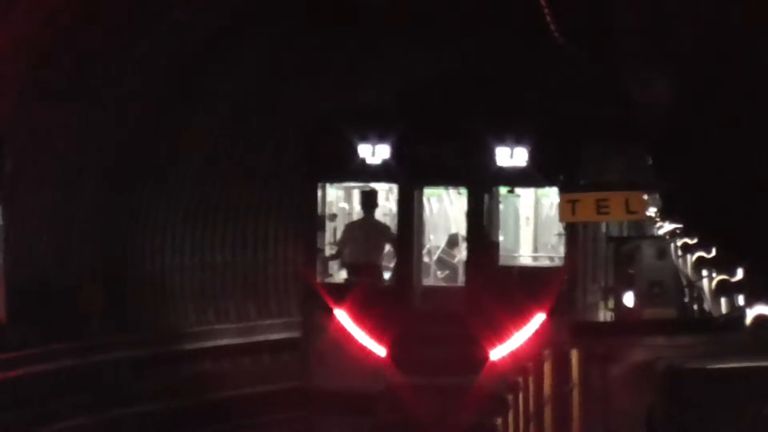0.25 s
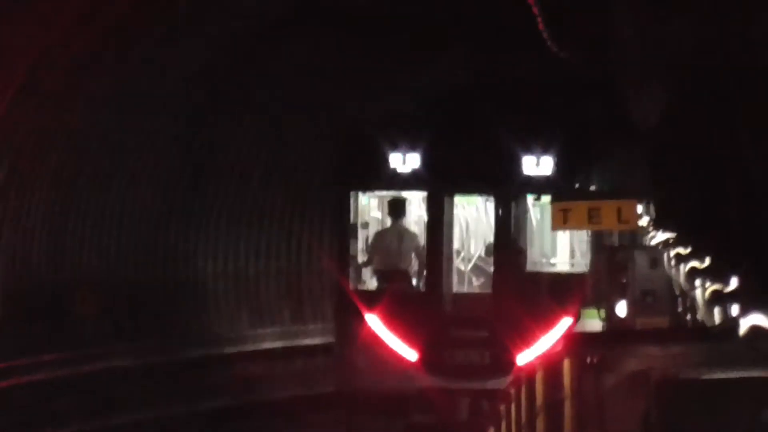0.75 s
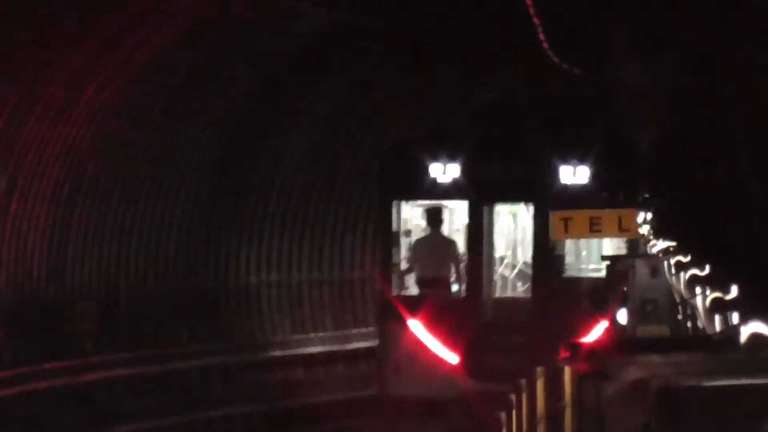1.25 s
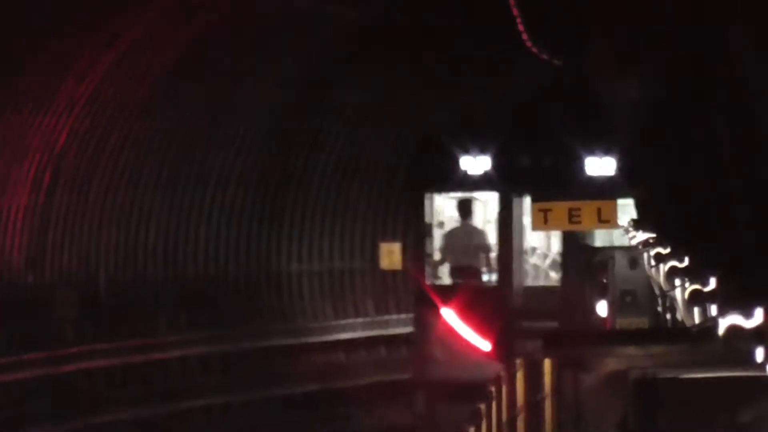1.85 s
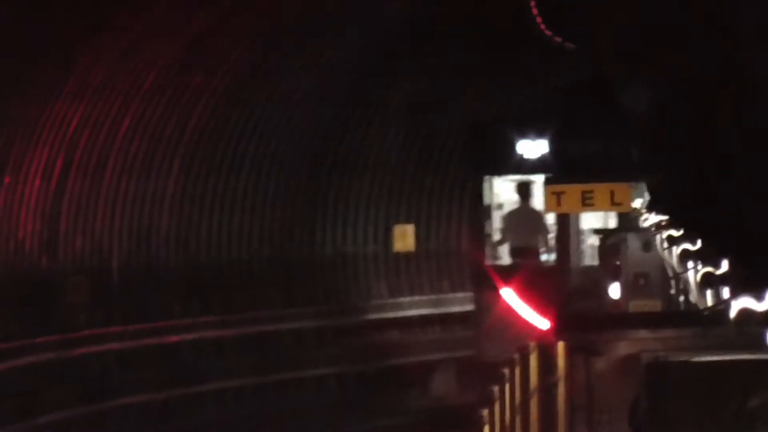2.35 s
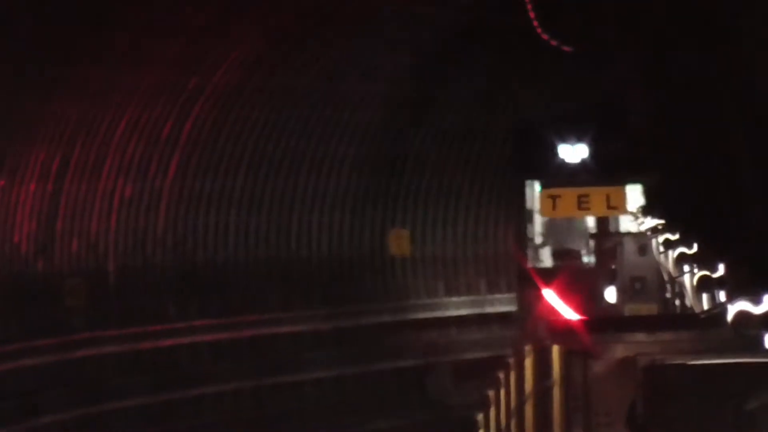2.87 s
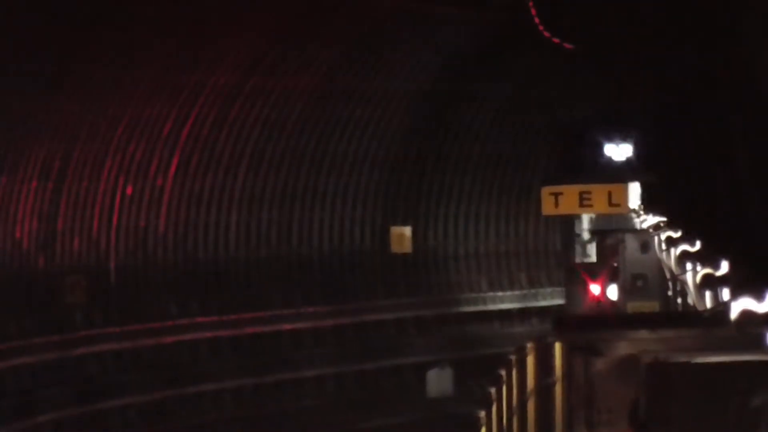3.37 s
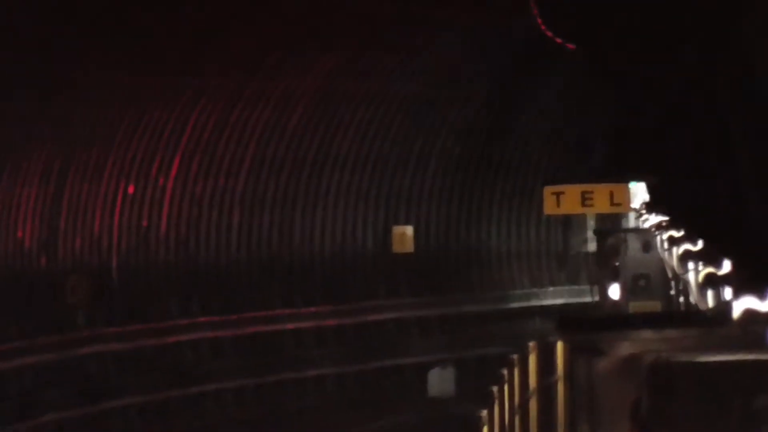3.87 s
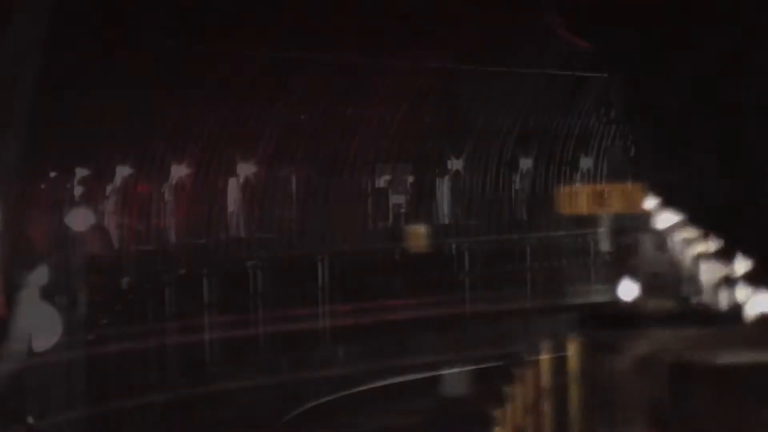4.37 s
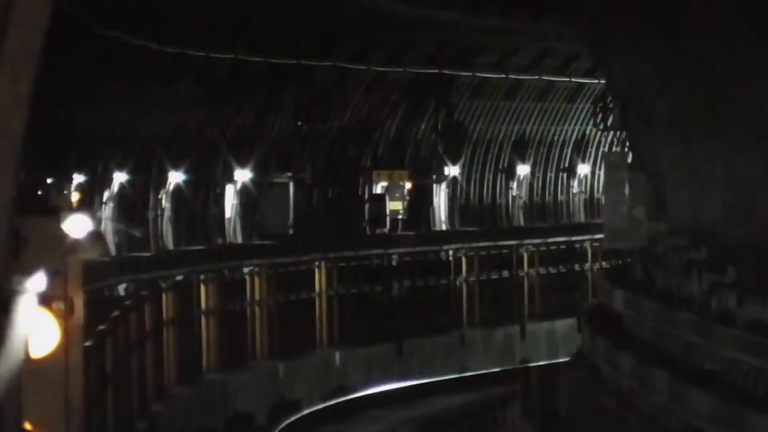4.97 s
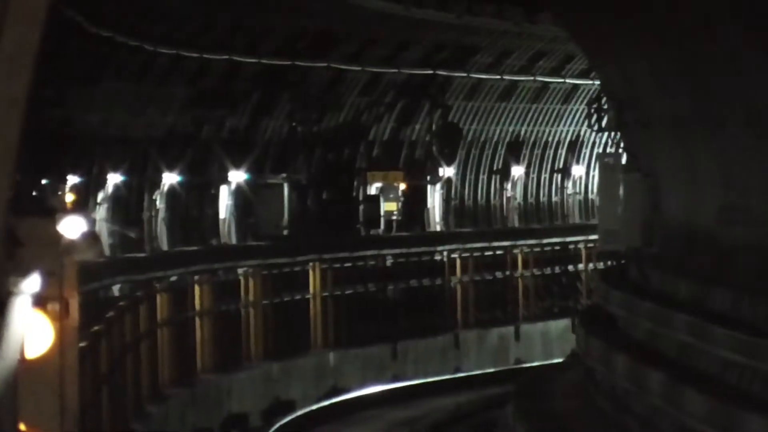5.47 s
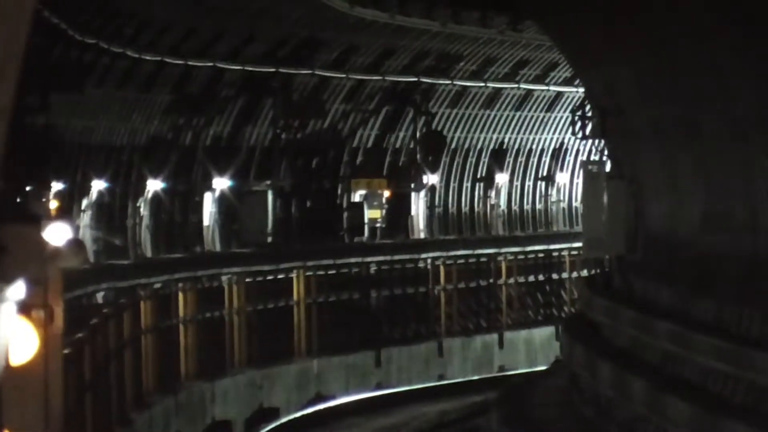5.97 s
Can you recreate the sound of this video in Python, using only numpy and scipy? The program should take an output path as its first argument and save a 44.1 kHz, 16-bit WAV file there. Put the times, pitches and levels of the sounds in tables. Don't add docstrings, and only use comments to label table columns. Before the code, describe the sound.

Hollow booming roll of a departing underground train fades with thin hiss; after a tiny gap, a quieter far hum, faint wheel squeal and late swelling roar.

```python
import sys
import numpy as np
from scipy import signal
from scipy.fft import rfft, irfft, next_fast_len
from scipy.io import wavfile
from scipy.ndimage import uniform_filter1d, map_coordinates

SR = 44100
rng = np.random.default_rng(int(sys.argv[2]) if len(sys.argv) > 2 else 0)


def gain_from_db(level_db):
    decades = np.asarray(level_db, float) / 20
    return 10 ** decades


def transcribe(u):
    v = np.clip(np.atleast_2d(u).T, -1, 1)
    q = np.round(v * 32767).astype(np.int16)
    wavfile.write(sys.argv[1], SR, q)


N = 274566
TIME = np.arange(N) / SR

# start_s, end_s
CUT = (4.6553, 4.6763)


def leaving_train():
    # pitch_hz, width_hz, level_db
    boom = [(95.3, 14.6, -5.5), (112.8, 4.5, 5.5), (131, 35, -1.5), (155.4, 38, -7)]
    drone = [(187, 11.4, -5), (217, 83, -5.5), (254, 30, -3), (250, 7.8, -14)]
    roar = [(342.7, 24, 0.5), (416.6, 62, 0), (512, 149, -7), (645, 74, -12.5), (765, 130, -12.5),
            (938, 187, -17.5)]
    wheel = [(1072, 58, -8), (1201, 122, -5.5), (1302, 31, -8)]
    # start_level_db, loss_db_per_s
    leaving = [
        (-29, -0.14),
        (-27, 1.24),
        (-30.5, 1.11),
        (-45.5, 1.56),
    ]
    # centre_s, length_s, change_db
    boom_swells = [
        (0, 0.11, -1),
        (.75, 0.17, -2.5),
        (2.7, .2, -1.5),
        (3.75, .2, -6.5),
        (4.36, 0.082, 3),
    ]
    drone_swells = [
        (0, 0.063, -1.5),
        (.55, 0.57, 2.5),
        (2.6, 0.52, 1.1),
        (4.15, .35, 3.5),
    ]
    roar_swells = [
        (0, 0.095, 1.9),
        (1.7, 0.27, 1.7),
        (2.9, .3, -1.1),
        (4.25, .15, 1.2),
    ]
    wheel_swells = [
        (0, 0.18, -1.5),
        (.95, 0.38, 4),
        (1.6, 0.54, 3.5),
        (3.65, 0.19, 3),
        (4.22, 0.065, -3),
    ]
    track = boom_swells, drone_swells, roar_swells, wheel_swells
    levels_db = [start_db - loss * TIME + swells(rows) + fades_db()
                 for (start_db, loss), rows in zip(leaving, track)]
    return rolling(levels_db, boom, drone, roar, wheel)


def coming_train():
    # pitch_hz, width_hz, level_db
    boom = [(99, 16, -13), (111.4, 41, 1), (141.5, 44, -3)]
    drone = [(241, 127, -4), (327, 26.5, -2), (458, 114, 0.5), (482, 62, 0)]
    roar = [(578, 44, -2.5), (673, 41, -4), (767, 100, -2), (904, 107, -7.5), (1024, 310, -12)]
    wheel = [(1130, 160, -5), (1270, 60, 0), (1350, 60, -4), (1480, 120, -14)]
    # far_level_db, gain_in_view_db, share_of_fade
    coming = [
        (-36, 3, 1.1),
        (-35, 1.5, 1.1),
        (-47, 8.5, .7),
        (-60, 12, .3),
    ]
    rounds_s, rise_s = 5.88, .03
    in_view = (1 + np.tanh((TIME - rounds_s) / rise_s)) / 2
    levels_db = [far_db + gain_db * in_view + share * fades_db() for far_db, gain_db, share in coming]
    return rolling(levels_db, boom, drone, roar, wheel)


def rolling(levels_db, boom, drone, roar, wheel):
    boom_db, drone_db, roar_db, wheel_db = levels_db
    return (gain_from_db(boom_db - 1.0) * noise(resonances(boom), steady=1.0)
            + gain_from_db(drone_db) * noise(resonances(drone), steady=.9)
            + gain_from_db(roar_db) * noise(resonances(roar), steady=0.5)
            + gain_from_db(wheel_db) * noise(resonances(wheel), steady=0.44))


def hum():
    # start_s, length_s, pitch_hz, level_db
    first_throbs = [(0.023, 0.5, 111.9, -23.5), (0.661, 0.035, 125.6, -28), (0.863, 0.018, 110.2, -22),
                    (1.0, .05, 127.3, -23), (1.139, 0.19, 112.4, -23.5), (1.448, 0.17, 112.4, -25),
                    (1.7, 0.13, 130, -29), (1.889, 0.32, 111.5, -27.5), (2.267, 0.15, 116.6, -31),
                    (2.54, 0.28, 111.2, -31), (2.85, 0.032, 116.5, -20), (3.004, 0.069, 112.4, -24),
                    (3.109, 0.05, 128.2, -27), (3.251, 0.062, 114.5, -26.5), (3.353, 0.098, 129.2, -28),
                    (3.507, 0.035, 114.9, -21.5), (3.59, 0.26, 135, -32), (3.903, 0.043, 131, -25),
                    (3.983, 0.024, 112.9, -24), (4.121, 0.049, 114.6, -22.5), (4.212, 0.19, 128, -26.5),
                    (4.552, 0.085, 113.5, -28.5)]
    second_throbs = [
        (4.85, .1, 141.1, -31.5),
        (4.986, 0.16, 142.3, -27),
        (5.375, 0.035, 139.3, -28),
        (5.528, 0.093, 140.9, -30.5),
        (5.786, 0.088, 141.9, -29),
        (5.972, 0.023, 120.8, -28.5),
        (6.043, 0.018, 139.6, -23.5),
        (6.142, 0.23, 143.6, -26),
    ]
    rise_s, fall_s, sag_db, rest_db = 0.053, .075, 4.5, -43.5
    throbs = np.concatenate([first_throbs, second_throbs])
    t = TIME[::50]
    each_db = np.array([held(s, rise_s, length, fall_s, db, sag_db, rest_db, t)
                        for s, length, hz, db in throbs])
    loudest = np.argmax(each_db - 1e-3 * np.abs(t - throbs[:, :1]), axis=0)
    curves = [throbs[loudest, 2], each_db.max(axis=0)]
    hz, hum_db = uniform_filter1d(curves, size=18, mode="nearest")
    return gain_from_db(np.interp(TIME, t, hum_db) - 0.5) * rough_line(np.interp(TIME, t, hz), 12, clear=3.9)


def songs():
    # centre_s, length_s, pitch_hz, width_hz, level_db
    wheel_songs = [
        (.05, .12, 1980, 60, -63),
        (.08, .15, 4300, 900, -67),
        (.05, .12, 7600, 700, -72),
        (1.2, .15, 2000, 60, -66),
        (2.35, .15, 1700, 70, -65),
        (2.4, .12, 1900, 60, -67),
        (2.45, .12, 1060, 50, -55),
        (3.9, .35, 4300, 900, -69),
    ]
    tube_songs = [
        (.12, 0.11, 250, 17, -29.5),
        (.45, 0.12, 232, 19, -28.5),
        (.78, 0.19, 253, 18, -30),
        (1.7, 0.21, 246, 18, -30),
        (2.6, .2, 247.9, 18, -38.5),
        (3.85, .15, 250, 18.1, -31.5),
        (4.2, .2, 256, 18.2, -29.5),
    ]
    total = 0
    for rows, clear in ((wheel_songs, 0), (tube_songs, 1.2)):
        for s, length, hz, width_hz, db in rows:
            bump = np.exp(-((TIME - s) / length) ** 2)
            total = total + gain_from_db(db) * bump * rough_line(hz, width_hz, clear=clear)
    return total


def drive():
    # start_s, length_s, level_db
    gear_throbs = [
        (.03, .012, -65),
        (.115, .02, -60),
        (.19, .05, -56),
        (.295, .04, -57.5),
    ]
    edge_s, rest_db, ends_s = .024, -76, .45
    gear_db = np.max([held(s, edge_s, length, edge_s, db, 0, rest_db) for s, length, db in gear_throbs], axis=0)
    whine_db = -74 - 1.7 * TIME + fades_db()
    whine = gain_from_db(whine_db) * rough_line(10415, 220, clear=.4)
    gear = gain_from_db(gear_db) * (TIME < ends_s) * rough_line(2352, 15, clear=4)
    return whine + gear


def squeal():
    start_s, attack_s = 5.11, 0.0518
    low_db, high_db = [held(start_s, attack_s, length, .15, db, loss * length, -100)
                       for db, loss, length in ((-77, 10, .45), (-73.5, 40, .35))]  # dB, loss dB per s, s
    low = gain_from_db(low_db - 2) * rough_line(7950, 450, clear=0)
    high = gain_from_db(high_db) * rough_line(9580, 400, clear=.2)

    slide_s, length_s, slide_db, loss_db_per_s = 5.14, .06, -74, 60
    from_hz, to_hz, climb_s = 9650, 11150, .016
    rise_db = held(slide_s, .06, length_s, .07, slide_db, loss_db_per_s * length_s, -110)
    rise_hz = to_hz - (to_hz - from_hz) * np.exp(-np.maximum(TIME - slide_s, 0) / climb_s)
    slide = gain_from_db(rise_db + 3.5) * rough_line(rise_hz, 500, clear=1.2)
    upper = gain_from_db(-78) * np.exp(-((TIME - 5.28) / .07) ** 2) * rough_line(11700, 990, clear=0)

    t = np.arange(SR // 2) / SR
    tail = rng.standard_normal((2, len(t))) * gain_from_db(-60 * t / .8)
    echo = signal.fftconvolve(slide, tail / np.linalg.norm(tail[0]), axes=1)[:, :N]
    return low + high + upper + slide + echo


def air():
    # pitch_hz, level_db (per Hz)
    low_hiss = [(500, -120), (1100, -13.5), (1400, -4.5), (1550, -11), (1790, -18.5), (1970, -14),
                (2650, -21), (4560, -21), (6000, -31), (12000, -120)]
    mid_hiss = [(2500, -120), (4800, -25), (5500, -19), (6150, -6.5), (7830, -1), (9500, -5.5),
                (9900, -0.5), (10500, -27), (16000, -120)]
    top_hiss = [(5000, -120), (9400, -30), (9900, -8), (10350, -2), (11500, 0), (14000, -1), (15000, -5),
                (15600, -9), (20000, -120)]
    # start_level_db, loss_db_per_s, gust_gain_db, second_place_level_db
    hiss_levels = [
        (-59, 0.37, 2, -66),
        (-71, 0.7, 4, -77),
        (-69, 2.5, -0.3, -81.5),
    ]
    # centre_s, length_s, strength
    gusts = [
        (0, 0.33, 1.2),
        (2.1, .4, 0.25),
        (4.0, 0.36, 0.98),
    ]
    fade_shares = (.7, .35)
    # time_s, level_db
    joints = [
        (.70, -57),
        (1.46, -63),
        (3.47, -62),
        (4.251, -61),
        (4.42, -63),
    ]
    at_first = TIME < CUT[1]
    fade_db = np.where(at_first, *fade_shares) * fades_db()
    low_db, mid_db, top_db = [fade_db + np.where(at_first, db - loss * TIME + gust_db * swells(gusts), far_db)
                              for db, loss, gust_db, far_db in hiss_levels]
    flutter_db = .45 * wobble(14) + .7 * wobble(30)
    hiss = (gain_from_db(low_db + 3.0) * noise(coloured(low_hiss), steady=0.14)
            + gain_from_db(mid_db + 3.0) * noise(coloured(mid_hiss), steady=.2)
            + gain_from_db(top_db + 7.0) * noise(coloured(top_hiss), steady=0.18))
    puffs = sum(gain_from_db(db - 60 * np.abs(TIME - s) / np.where(TIME < s, .03, .06)) for s, db in joints)
    puff_colour = coloured([(800, -120), (2500, 1), (8000, -2), (15000, -24)])
    return gain_from_db(flutter_db) * hiss + puffs * noise(puff_colour, steady=0)


def ground():
    # pitch_hz, level_db (per Hz)
    rumble = [(15, -56), (30, -12), (45, 3.5), (55, 4), (66, 7), (82, 11), (95, 11.5), (120, -21),
              (250, -120)]
    # first_place_db, second_place_db
    place_db = (-42.5, -49.5)
    # centre_s, length_s, gain_db
    rumble_swells = [
        (2.1, 0.82, 4),
    ]
    rumble_db = np.where(TIME < CUT[1], place_db[0] + swells(rumble_swells), place_db[1] + fades_db())
    return gain_from_db(rumble_db) * noise(coloured(rumble), steady=0.18)


def noise(gain, steady):
    # pitch_hz, likeness (0-1)
    alike = [(25, .4), (50, 0.74), (130, 0.98), (290, 0.96), (640, 0.81), (1400, 0.66), (3100, 0.52),
             (6800, 0.34), (15000, 0.17)]

    def middle_and_side(f):
        turn = np.arccos(np.clip(along(alike, f), 0, 1)) / 2
        return gain(f) * [np.cos(turn), np.sin(turn)]

    mid, side = filtered(rng.standard_normal((2, N)), middle_and_side)
    power = uniform_filter1d(unit(mid) ** 2, size=2000)
    swell = np.abs(uniform_filter1d(power, size=2000)) + 0.037
    return unit(np.array([mid + side, mid - side]) / swell ** (np.clip(steady, 0, 1) / 2))


def rough_line(hz, width_hz, clear):
    knots = rng.standard_normal((2, int(N * 1000 / SR) + 2))[:, :int(TIME[-1] * width_hz) + 2]
    knots = knots + 2.7 * knots[0]
    flicker = np.array([np.interp(TIME * width_hz, np.arange(len(k)), k) for k in knots])
    tone = np.sin(2 * np.pi * np.cumsum(hz + 0 * TIME) / SR)
    return unit((clear + unit(flicker)) * tone)


def resonances(modes):
    def gain(f):
        return np.sqrt(sum(gain_from_db(2 * db) / (1 + ((f * f - centre * centre) / ((f + 1) * width)) ** 2) ** 1.776
                           for centre, width, db in modes))
    return gain


def coloured(points):
    return lambda f: gain_from_db(along(points, f))


def filtered(x, response):
    m = next_fast_len(N + 8192)
    return irfft(rfft(x, m) * response(np.fft.rfftfreq(m, 1 / SR)), m)[..., :N]


def along(points, hz):
    f, v = np.transpose(points)
    return np.interp(np.log(hz + 1), np.log(f + 1), v)


def unit(x):
    return x / np.sqrt(np.mean(x ** 2) + 1e-20)


def wobble(rate):
    return map_coordinates(rng.standard_normal(int(N * rate / SR) + 4), [TIME * rate])


def swells(rows):
    return sum(size * np.exp(-((TIME - s) / length) ** 2) for s, length, size in rows)


def held(s, rise, length, fall, top_db, sag_db, rest_db, t=TIME):
    return np.interp(t, [s - rise, s, s + length, s + length + fall],
                     [rest_db, top_db, top_db - sag_db, rest_db])


def fades_db():
    out_s, out_db, in_s, in_db = .26, -7.5, .22, -10
    return np.interp(TIME, [CUT[0] - out_s, CUT[0], CUT[1], CUT[1] + in_s], [0, out_db, in_db, 0])


def scene():
    first = leaving_train() + songs() + drive()
    second = coming_train() + squeal()
    return np.where(TIME < CUT[1] - .01, first, second) + hum() + air() + ground()


def thinned(x):
    # pitch_hz, share (0-1)
    holes = [(4800, 0), (5500, .12), (6500, .1), (7200, .01), (9650, .03), (9850, .4), (10150, .4),
             (10250, 0), (14500, .03), (15600, .35)]
    hz, t, z = signal.stft(x, SR, nperseg=1024)
    luck = rng.random((len(hz) // 4 + 1, z.shape[2] // 4 + 1))
    luck = luck.repeat(4, axis=0).repeat(4, axis=1)
    near_whine = (abs(hz - 10000) < 400)[:, None]
    share = along(holes, hz)[:, None] * np.where((t > CUT[1]) & near_whine, .1, 1)
    kept = luck[:len(hz), :z.shape[2]] > share
    return signal.istft(z * np.where(kept, 1, gain_from_db(-26)), SR, nperseg=1024)[1][:, :N]


def roll_off(x):
    return signal.sosfilt(signal.butter(12, 15640, fs=SR, output="sos"), x)


def record(dry):
    # pitch_hz, left_minus_right_db
    lean = [(60, 0), (110, 0.5), (200, -1), (380, 1), (700, -0.5), (1290, -1.0), (2380, -0.5), (4400, -1),
            (8120, -1), (15000, -4.5)]
    leaning = filtered(dry, lambda f: gain_from_db(np.outer([.5, -.5], along(lean, f))))
    gate = np.clip((CUT[0] - TIME) / .0008, 0, 1) + np.clip((TIME - CUT[1]) / .0004, 0, 1)
    return roll_off(thinned(leaning) * gate)


dry = scene()
out = record(dry)
transcribe(out)
```